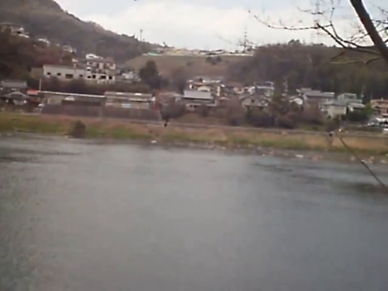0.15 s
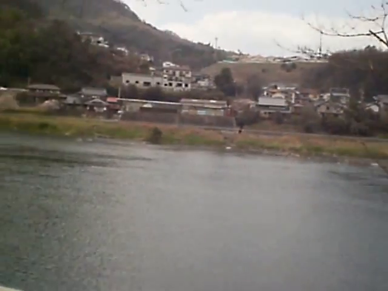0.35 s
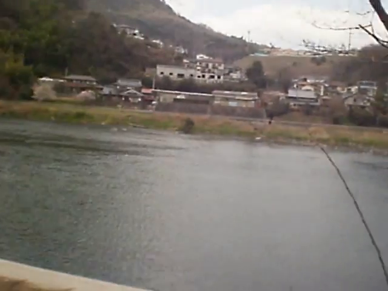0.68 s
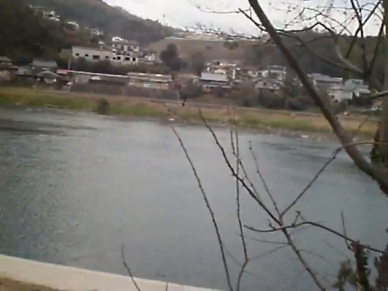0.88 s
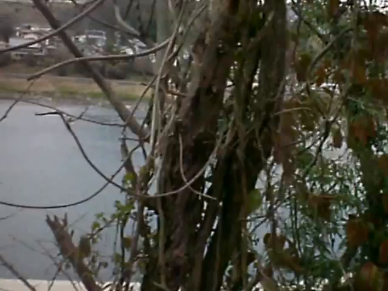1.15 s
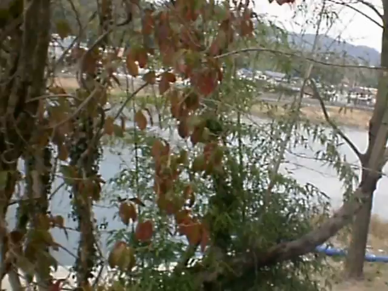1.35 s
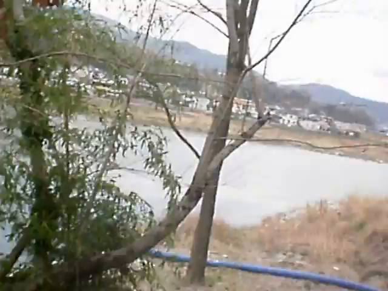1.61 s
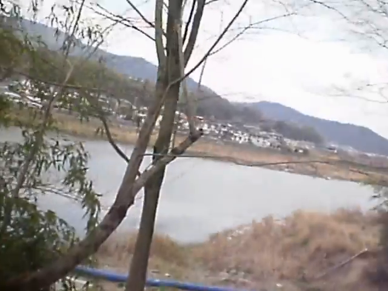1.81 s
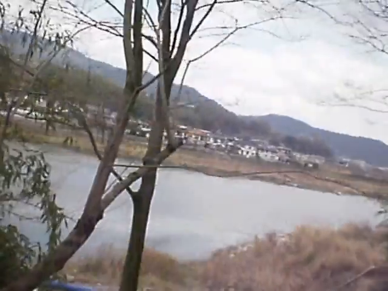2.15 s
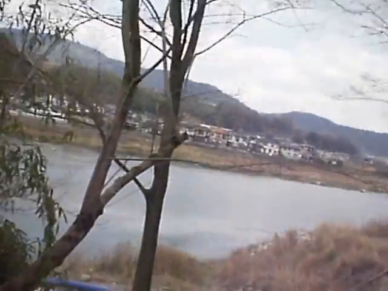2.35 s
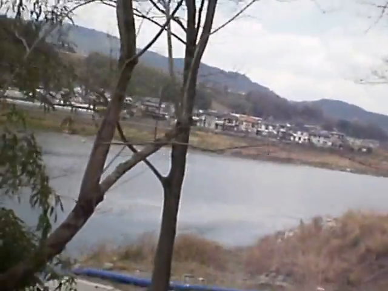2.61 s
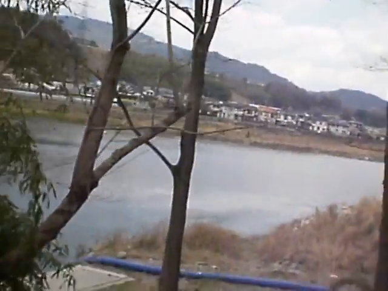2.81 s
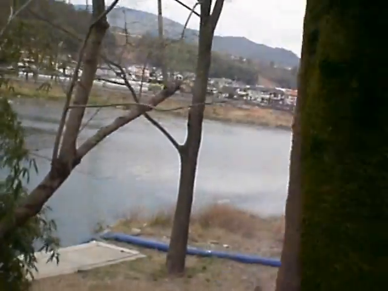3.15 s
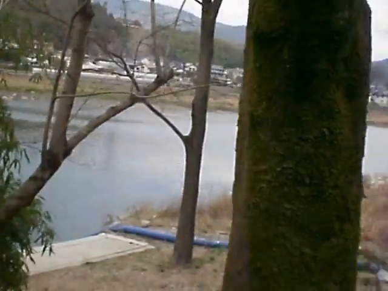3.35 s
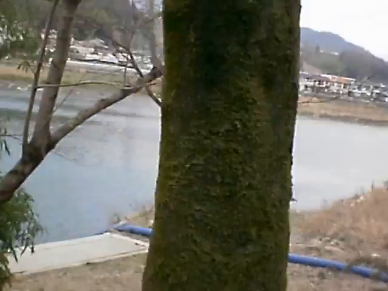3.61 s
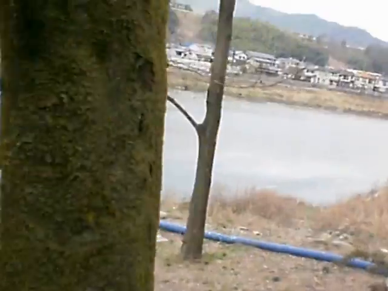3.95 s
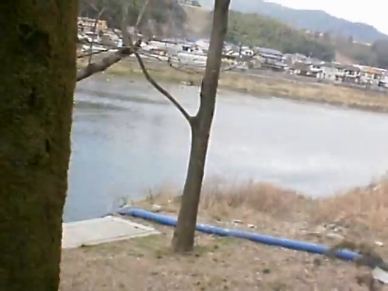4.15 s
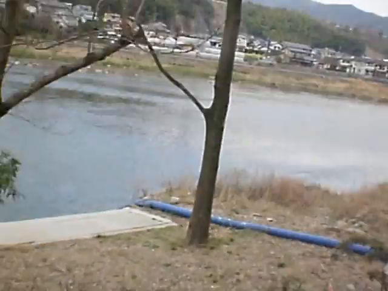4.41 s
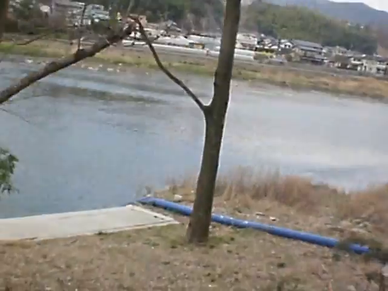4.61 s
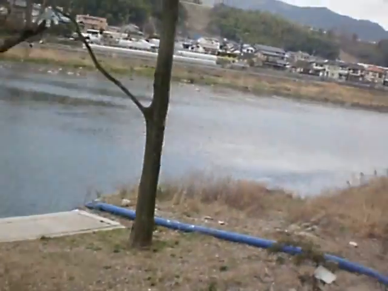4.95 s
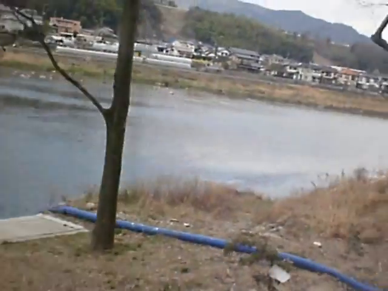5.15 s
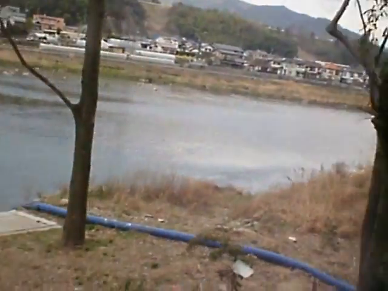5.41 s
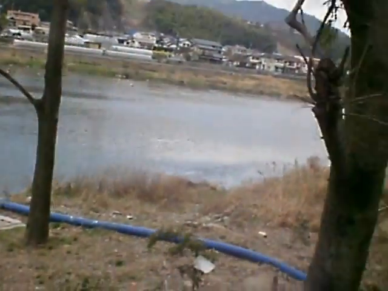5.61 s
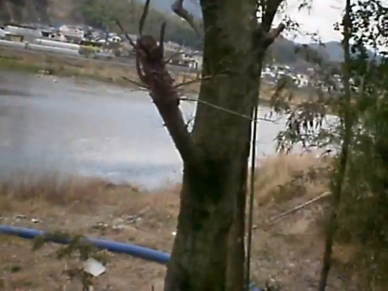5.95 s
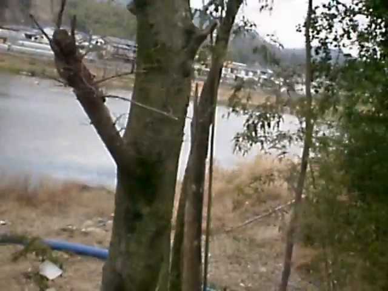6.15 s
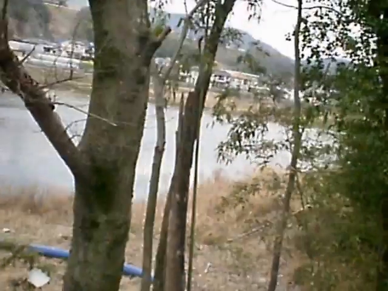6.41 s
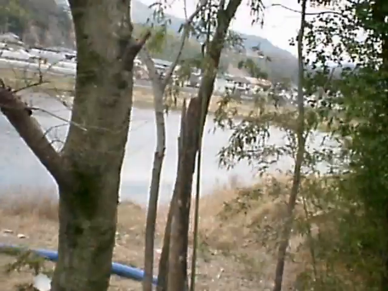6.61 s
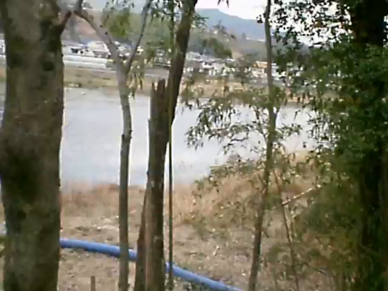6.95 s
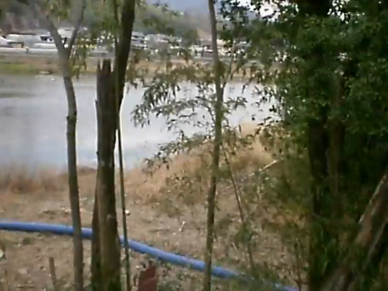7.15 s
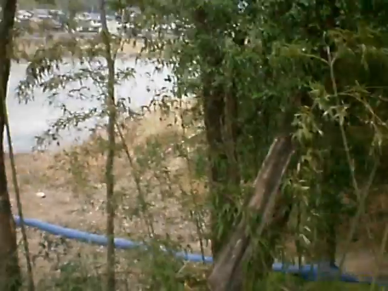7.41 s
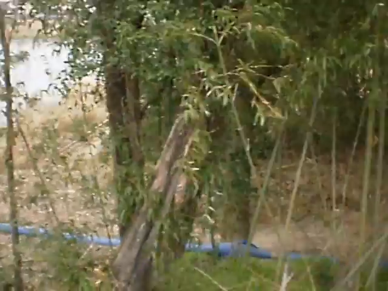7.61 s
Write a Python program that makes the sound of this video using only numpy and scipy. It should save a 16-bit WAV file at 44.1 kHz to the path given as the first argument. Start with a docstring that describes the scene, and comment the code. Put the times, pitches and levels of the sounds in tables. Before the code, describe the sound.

Dry stalks crack and crunch under unhurried steps outdoors, while a river hisses behind and wind briefly buffets the microphone.

```python
"""Slow footsteps on dry grass and dead stalks on a river bank: a light scuff, then about two steps a second.
Heel and sole crush thin fibres into a crunch, single stalks snap, trodden stems tick as they spring back.
Behind: river rush, valley hiss, far rumble and a light breeze; one gust buffets the microphone. The small
camera has a narrow band, and the hardest snaps overflow its converter: their crests wrap round to negative full
scale as dull pops."""
import sys
import numpy as np
from scipy import signal
from scipy.fft import rfft, irfft, next_fast_len
from scipy.io import wavfile
from scipy.ndimage import minimum_filter1d

SR = 44100
rng = np.random.default_rng(int(sys.argv[2]) if len(sys.argv) > 2 else 0)


def put_to_file(sound):
    """Save the sound as 16-bit audio at rate SR, in the file named by the first command-line argument."""
    columns = np.atleast_2d(sound).T  # one column per channel
    safe = np.clip(columns, -1, 1)
    whole_steps = np.round(safe * 32767)
    wavfile.write(sys.argv[1], SR, whole_steps.astype(np.int16))


N = 343310
FFT_SIZE = next_fast_len(N + SR // 10, real=True)

# crushed litter: (frequency [Hz], density [dB])
LITTER_SPECTRUM = [(250, -37.5), (600, -23), (850, -12), (1300, -3), (1800, -14), (2150, -4.5), (2450, -1),
                   (3000, -1), (3600, -4.5), (4350, -14), (4900, -23)]
# foot contacts: a light scuff at 0.275 s, then steps, heel before sole
# (sole time [s], heel level [dB], sole level [dB], fall time [s])
FOOT_CONTACTS = [(0.275, -35.5, -37, .025), (0.377, -34.5, -26, .026), (0.873, -27, -38, 0.029),
                 (1.362, -35, -24.5, .042), (1.904, -23.5, -28.5, 0.014), (2.412, -26.5, -17.5, .012),
                 (2.679, -35, -29, 0.018), (2.904, -40, -10.5, 0.021), (3.298, -3.5, -5, .012),
                 (3.883, -36.5, -34, .014), (4.391, -21, -9, 0.0088), (4.848, -21, -24.5, 0.017),
                 (5.378, -27, -20.5, 0.011), (6.382, -32.5, -23.5, .016), (6.904, -18, -21, 0.0073),
                 (7.41, -27, -26, 0.028)]


def from_db(db):
    return 10 ** (np.asarray(db) / 20)


def unit_rms(x):
    return x / np.sqrt(np.mean(x ** 2) + 1e-20)


def per_sample(rows):
    """Each level column of a time curve, at every sample."""
    times_s, *columns = np.transpose(rows)
    return [np.interp(np.arange(N) / SR, times_s, column) for column in columns]


def response(spectrum):
    """Gain per FFT bin, rolling off beyond both ends of the spectrum."""
    hz, db = np.transpose(spectrum)
    bin_hz = np.maximum(np.arange(FFT_SIZE // 2 + 1) * SR / FFT_SIZE, 1)
    gain = from_db(np.interp(np.log(bin_hz), np.log(hz), db))
    return gain * np.minimum(bin_hz / hz[0], 1) ** 2 * np.minimum(hz[-1] / bin_hz, 1) ** 20


def filtered(x, gain):
    return irfft(rfft(x, FFT_SIZE) * gain, FFT_SIZE)[..., :N]


def coloured(x, spectrum):
    """Shape x to a spectrum; white input keeps its power."""
    return filtered(x, unit_rms(response(spectrum)))


def noise(spectrum):
    return coloured(rng.standard_normal(N), spectrum)


def drift(rate_hz):
    """Straight lines between unit-variance random knots."""
    knots = rng.standard_normal(N // 20)
    return np.interp(np.arange(N) / SR * rate_hz, np.arange(len(knots)), knots)


def add_centred(out, sound, time_s):
    at = round(time_s * SR) - len(sound) // 2 + np.arange(len(sound))
    inside = (at >= 0) & (at < N)
    out[at[inside]] += sound[inside]


def ping(t, hz, swell_s):
    """Heavily damped vibration: peak 1 at t = 0, gone within a few cycles."""
    age = np.maximum(t / swell_s + 1, 0)
    return (age * np.exp(1 - age)) ** 4 * np.cos(2 * np.pi * hz * t)


def swell(age_s, rise_s, fall_s):
    """Exponential rise to 1 at age 0, then exponential fall."""
    return np.exp(np.minimum(age_s, 0) / rise_s - np.maximum(age_s, 0) / fall_s)


def valley(rumble_gain_db=2.0, rush_gain_db=0.21, hiss_gain_db=-0.3, rumble_waver_db=1.4, waver_db=1.5):
    """Far rumble, river rush and fine hiss, wavering and growing louder along the walk."""
    # far rumble: (time [s], relative level [dB])
    rumble_curve = [(2.2, -47.5), (3.13, -44.5), (3.43, -46.5), (6.82, -40.5), (7.36, -44), (7.78, -42.5)]
    # rush and hiss: (time [s], relative rush level [dB], relative hiss level [dB])
    rush_hiss_curve = [(0.1, -38, -38.5), (0.7, -38, -42), (1.92, -35.5, -35.5), (2.2, -37.5, -39.5),
                       (3.07, -36.5, -37), (4.1, -36.5, -39), (4.68, -36, -38), (7.22, -32.5, -36),
                       (7.78, -31.5, -34.5)]
    # spectra of the three layers: (frequency [Hz], density [dB])
    rumble_spectrum = [(15, -18), (35, -10), (60, -8), (100, -6), (150, -2.5), (210, -1), (260, -3),
                       (310, -8), (400, -14.5), (700, -33)]
    rush_spectrum = [(200, -17.5), (350, -5), (500, -3.5), (700, -2.5), (950, -1.5), (1300, -1.5),
                     (1600, -4.5), (1900, -10), (2500, -33)]
    hiss_spectrum = [(1400, -25.5), (1900, -5), (2400, -0.5), (2900, -3), (3500, -3.5), (4350, -15),
                     (4700, -24), (5000, -28.5), (5300, -49.5)]
    rumble_db = per_sample(rumble_curve)[0]
    rush_db, hiss_db = per_sample(rush_hiss_curve)
    rumble = from_db(rumble_db + rumble_gain_db + rumble_waver_db * drift(17)) * noise(rumble_spectrum)
    rush = from_db(rush_db + rush_gain_db + waver_db * drift(21)) * noise(rush_spectrum)
    hiss = from_db(hiss_db + hiss_gain_db + waver_db * drift(20)) * noise(hiss_spectrum)
    return rumble + rush + hiss


def wind(strong_db=-27, gust_edge_db_per_s=33, waver_db=0.5):
    """Eddies at the microphone port; stronger wind sheds smaller, faster ones."""
    # one gust and the light breeze around it: (time [s], level [dB])
    gust = [(0.56, -40), (0.69, -36.5), (0.704, -32.5), (0.864, -26.5), (1.198, -23), (1.242, -30.5),
            (1.414, -32), (1.54, -41.5)]
    breeze = [(0, -44), (2.1, -48.5), (4, -56.5), (6.7, -60), (7.2, -51), (7.78, -47)]
    t = np.arange(N) / SR
    outside_gust_s = np.abs(t - np.clip(t, gust[0][0], gust[-1][0]))
    gust_db = per_sample(gust)[0] - gust_edge_db_per_s * outside_gust_s
    level_db = np.maximum(gust_db, per_sample(breeze)[0])
    fast_share = np.clip(from_db(level_db - strong_db) ** 2, 0, .88)
    slow = noise([(15, -15.5), (40, -8.5), (75, -0.5), (120, -2), (200, -17), (400, -34)])
    fast = noise([(60, -22), (105, -11), (150, 1.5), (220, -5), (280, -11), (400, -22.5), (700, -35.5)])
    eddies = np.sqrt(1 - fast_share) * slow + np.sqrt(fast_share) * fast
    return from_db(level_db - waver_db * drift(31)) * eddies


def stray_ticks(per_s=14, level_db=-19, spread_db=5.5):
    """Trodden stems spring back at random times."""
    sizes = from_db(level_db + spread_db * np.clip(rng.standard_normal(N), -2, 2))
    return coloured(sizes * (rng.random(N) < per_s / SR), LITTER_SPECTRUM)


def snaps(stalk_hz=3010, drop_hz_per_db=6.5, spread_hz=200, swell_s=0.00049,
          body_hz=1250, body_swell_s=0.0011, body_db=-4, ground_db=-13,
          scatter_db=-23, scatter_s=0.003, rustle_db=-40, rustle_s=0.015):
    """A stalk breaks with a ping; the ground reflects it, the litter scatters a tail and rustles on."""
    # thick stalks breaking: (time [s], level [dB], relative woody body level [dB])
    thick_stalks = [(0.0236, -6.5, -41), (0.3016, -6, -20), (0.3176, -2, -23), (0.7704, -14.5, -16),
                    (0.8901, -3, -32), (1.096, -12, -32), (1.2024, -5, -5), (1.3482, 1.5, -18),
                    (1.37, -12.5, 4), (1.412, -10.5, -11), (1.6436, 8.5, -32), (1.7687, 9, -32),
                    (1.7711, 10, -31), (1.786, -5.5, -9.5), (1.8225, -13.5, -6), (1.9057, -7.5, -3.5),
                    (1.9339, -9.5, -7), (2.4075, -6.5, -16.5), (2.4108, -7.5, -19), (2.6413, -11, -19),
                    (2.6786, -5.5, -11), (2.7484, -10.5, -22), (2.9062, 4, -15), (2.917, -0.5, -28),
                    (2.927, -6.5, -12.5), (2.9641, -7.5, -21.5), (3.174, -13, -25.5), (3.2607, 3.5, -12.5),
                    (3.2862, 10.5, -28.5), (3.2935, -3, -16), (3.3385, -9, -0.5), (3.3414, -6, -11),
                    (3.848, -18.5, 7), (4.3333, -12.5, -18), (4.3506, -6, -27), (4.3715, 10.5, -26),
                    (4.3732, 10, -24.5), (4.375, 10, -41), (4.3887, 2, -23), (4.391, 4.5, -4),
                    (4.3936, 9.5, -9), (4.4227, 9, -37), (4.4263, 1.5, -27.5), (4.532, 1, -24),
                    (4.5464, -10, -23.5), (4.583, -2.5, -19.5), (4.668, -14.5, -14.5), (4.6984, -9, -32.5),
                    (4.8083, -6.5, -7), (4.8529, -2.5, -11.5), (5.2523, -9.5, -9), (5.3475, -2.5, -27.5),
                    (5.374, -6.5, -22), (5.3824, -12.5, -2), (6.36, -9, -20), (6.3811, -6, -7),
                    (6.655, -14.5, -23), (6.847, -9.5, -4.5), (6.9015, -4, -13), (6.9125, -5.5, -28),
                    (7.3681, -7, -33), (7.413, -3.5, -8), (7.624, 4.5, -36.5)]
    t = np.arange(-SR // 10, SR // 10) / SR
    cracks, tails = np.zeros(N), np.zeros(N)
    scatter = from_db(scatter_db) * np.exp(-np.abs(t) / scatter_s)
    rustle = from_db(rustle_db) * np.exp(-np.abs(t) / rustle_s)
    tail = (t > swell_s) * (scatter + rustle)
    stalks = thin_stalks() + thick_stalks
    for (time_s, db, woody_db), (path, size, stiffness) in zip(stalks, rng.random((len(stalks), 3))):
        hz = stalk_hz - drop_hz_per_db * woody_db + spread_hz * (2 * stiffness - 1)   # woodier is lower
        body = from_db(woody_db + body_db) * ping(t, body_hz * (0.59 + .5 * size), body_swell_s)
        echo_delay_s = 0.001503 + .0015 * path
        echo = from_db(ground_db) * ping(t - echo_delay_s, hz, swell_s)
        add_centred(cracks, from_db(db) * (ping(t, hz, swell_s) + body + echo), time_s)
        add_centred(tails, from_db(db) * tail, time_s)
    return cracks + coloured(tails * rng.standard_normal(N), LITTER_SPECTRUM)


def thin_stalks(per_contact=5, spread_s=.032, level_db=-19.5, spread_db=4.5,
                db_per_contact_db=.45, ordinary_contact_db=-24, woody_db=-13, woody_spread_db=7):
    """Thin stalks give way at each foot contact, louder under a heavier one; rows as in thick_stalks."""
    draws = np.clip(rng.standard_normal((len(FOOT_CONTACTS), per_contact, 3)), -2, 2)
    rows = []
    for (sole_s, heel_db, sole_db, _), stalks in zip(FOOT_CONTACTS, draws):
        mean_db = level_db + db_per_contact_db * (max(heel_db, sole_db) - ordinary_contact_db)
        rows += [(sole_s + spread_s * when, mean_db + spread_db * size, woody_db + woody_spread_db * wood)
                 for when, size, wood in stalks]
    return rows


def crunches(heel_lead_s=.035, heel_rise_s=0.0022, sole_rise_per_fall=0.65, settling_db=-22,
             settling_s=0.09, fibres_per_s=3000, reference_db=-21.5, size_spread_db=1.5, gain_db=-0.5):
    """Many thin fibres break under the foot; the bent grass then rustles as it settles."""
    t, power = np.arange(N) / SR, np.zeros(N)
    for sole_s, heel_db, sole_db, fall_s in FOOT_CONTACTS:
        near = slice(max(0, int((sole_s - .5) * SR)), int((sole_s + .5) * SR))
        heel = (heel_lead_s, heel_db, heel_rise_s)
        sole = (0, sole_db, sole_rise_per_fall * fall_s)
        for lead_s, db, rise_s in (heel, sole):
            age_s = t[near] - sole_s + lead_s
            settling = from_db(settling_db) * (age_s > 0) * np.exp(-np.abs(age_s) / settling_s)
            power[near] += from_db(db) ** 2 * (swell(age_s, rise_s, fall_s) ** 2 + settling ** 2)
    push = np.sqrt(power)
    # hard push: many fibres at once; light push: separate grains
    chance = np.clip(fibres_per_s / SR * push / from_db(reference_db), .01, 1)
    sizes = from_db(size_spread_db * np.minimum(rng.exponential(1, N), 3))
    signs = rng.choice([-1, 1], N)
    breaks = unit_rms(sizes * signs) * (rng.random(N) < chance) / np.sqrt(chance)
    return from_db(gain_db) * coloured(breaks * push, LITTER_SPECTRUM)


def scene():
    return (crunches() + snaps() + stray_ticks() + valley() + wind())[None]


def record(dry, ceiling=0.97, overflow=2.0, pop=0.87, band_hz=4780, cutoff_hz=15500):
    """Peaks saturate; the highest positive ones overflow to negative and pop. Then band limit and clip."""
    # microphone behind its small port: (frequency [Hz], gain [dB])
    microphone = [(10, 0), (2000, 0), (3650, 0), (4000, -4), (4300, -1), (5300, 3)]
    heard = filtered(dry, response(microphone))
    crest = -minimum_filter1d(-heard, size=4, axis=-1)   # running maximum
    saturated = heard / (1 + (np.abs(heard) / ceiling) ** 4) ** (1 / 4)
    wrapped = np.where(crest > overflow, -pop, saturated)
    band_taps = signal.firwin(161, band_hz, window=("kaiser", 8), fs=SR)
    narrow = signal.fftconvolve(wrapped, band_taps[None], mode="same")
    low_pass = signal.cheby1(12, .2, cutoff_hz, fs=SR, output="sos")
    return signal.sosfilt(low_pass, np.clip(narrow, -.98, .98))


dry = scene()
out = record(dry)
put_to_file(out)
```